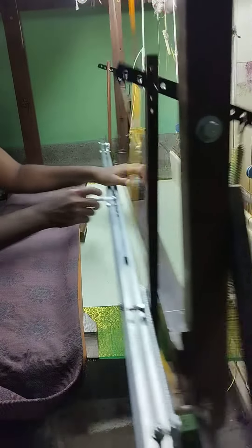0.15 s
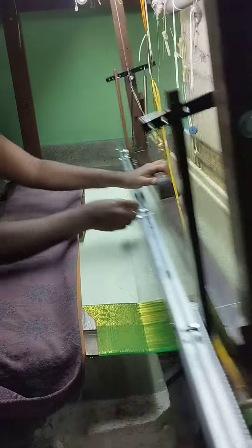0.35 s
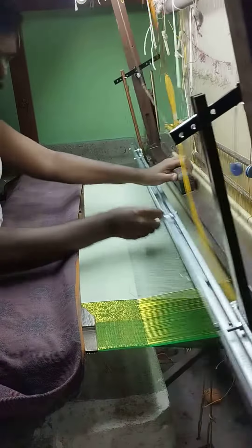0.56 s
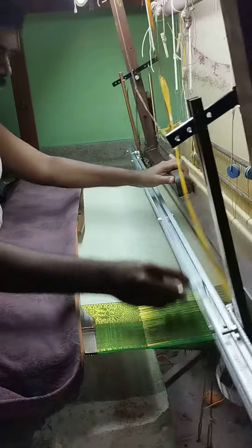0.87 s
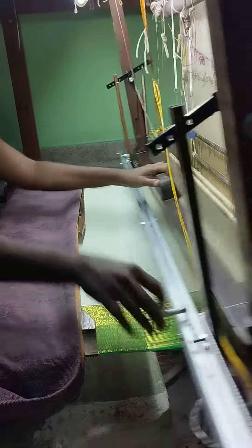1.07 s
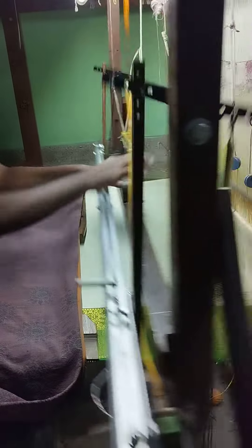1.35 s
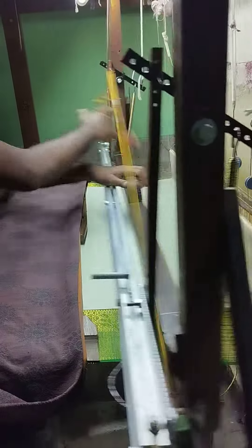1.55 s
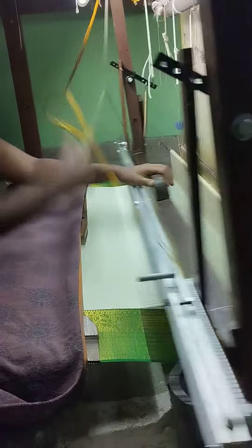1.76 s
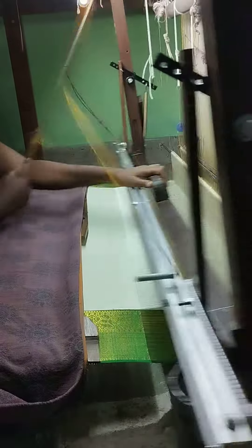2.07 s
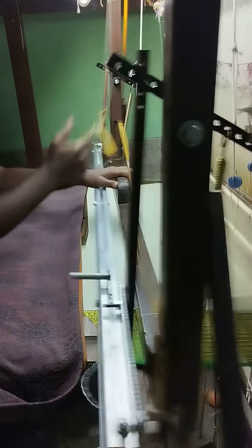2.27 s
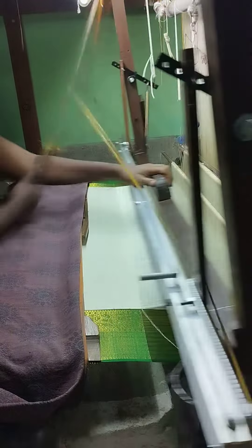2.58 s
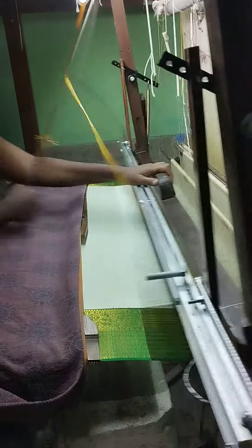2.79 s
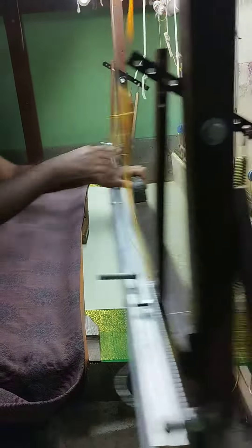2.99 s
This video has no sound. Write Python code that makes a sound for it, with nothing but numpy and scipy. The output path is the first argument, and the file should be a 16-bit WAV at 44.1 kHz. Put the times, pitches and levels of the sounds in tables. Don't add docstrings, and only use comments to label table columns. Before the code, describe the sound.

Handloom clatter: hard wood-and-metal clacks, ticking wires, a rail scrape and low frame thumps

```python
import sys
import numpy as np
from scipy import signal
from scipy.fft import rfft, irfft, next_fast_len
from scipy.io import wavfile

SR = 44100
rng = np.random.default_rng(int(sys.argv[2]) if len(sys.argv) > 2 else 0)


def to_wav(sig):
    pcm = np.clip(np.atleast_2d(sig), -1, 1) * 32767
    pcm = np.round(pcm).astype(np.int16)
    wavfile.write(sys.argv[1], SR, pcm.T)


def gain_from_db(level_db):
    decades = np.asarray(level_db, float) / 20
    return 10 ** decades


N = 138033

# pitch_hz, level_db [dB per Hz]
AIR_SPECTRUM = [(20, 1.5), (60, 3), (260, 5), (600, -4), (2500, -5.5), (6500, -15.5), (9000, -15),
                (15000, -26)]
# start_s, level_db [peak], brightness_db, centre_hz, chatter_t60_s
LEFT_CLACKS = [(-0.02, -10, -10, 1120, 0.4), (0.033, -17.5, -4, 2080, 0.28), (0.127, -25, -2, 6040, 0.25),
               (0.174, -12.5, -14, 1550, 0.083), (0.215, -26, -3, 2500, 0.3), (0.26, -27, -3, 4500, 0.3),
               (0.303, -27.5, 0, 3250, 0.35), (0.369, -14.5, -8, 2075, 0.17), (0.383, -22, 1, 3000, 0.15),
               (0.393, -15.5, -2.5, 4500, 0.097), (0.403, -18, -2.5, 3260, 0.21),
               (0.498, -19, -6, 860, 0.45), (0.618, -23, -5, 2650, 0.19), (1.0185, -2, -17, 2400, 0.12),
               (1.035, -11, -17, 2480, 0.25), (1.376, -19, 0.5, 3960, 0.1), (1.488, -10, -16, 2500, 0.068),
               (1.496, -10, -12, 3080, 0.06), (1.506, -12, -13, 2400, 0.081),
               (1.535, -9.5, -22, 1560, 0.064), (1.546, -13.5, -20, 1050, 0.17),
               (1.794, -22, -21, 1470, 0.074), (1.808, -22.5, -19, 1000, 0.15),
               (1.862, -19.5, -17, 1500, 0.26), (1.884, -7, -17, 980, 0.19), (1.904, -13.5, -6, 3080, 0.26),
               (2.848, -29, -31, 1050, 0.25), (2.872, -23, -15.5, 1990, 0.15),
               (2.8778, -4.5, -5.5, 2890, 0.11), (2.892, -9, -4, 2900, 0.11), (2.928, -16, -4.5, 2970, 0.2),
               (2.983, -16, -8, 3020, 0.23)]
# start_s, level_db [peak], brightness_db, centre_hz, chatter_t60_s
MIDDLE_CLACKS = [(2.1215, -11.5, -2.5, 2000, 0.053), (2.1265, -9.5, -3, 2630, 0.025),
                 (2.205, -24, -1, 2630, 0.2), (2.249, -14, -9, 1090, 0.25), (2.26, -12, 2, 4400, 0.031),
                 (2.337, -14, -7, 710, 0.1), (2.346, -5.5, -10, 2500, 0.16), (2.363, -8, -6, 1300, 0.16),
                 (2.376, -8, -9.5, 3080, 0.081), (2.398, -14.5, -20, 1600, 0.22),
                 (2.412, -12.5, -28, 1800, 0.27), (2.593, -28, -21, 2500, 0.1),
                 (2.601, -19.5, -7, 1000, 0.1), (2.616, -17, -12, 820, 0.15), (2.661, -20, -6, 2750, 0.044),
                 (2.6652, -8, -4, 2820, 0.023), (2.6795, -8, -7, 2620, 0.02),
                 (2.685, -15, -20, 2400, 0.064), (2.719, -13.5, -6, 2700, 0.029)]
# pitch_hz, level_db
CLACK_BODY = [(300, -45), (650, -5.5), (1000, -1), (2600, -2), (4000, -8)]
# pitch_hz, level_db
CLACK_EDGE = [(2500, -17.5), (4000, -4), (6300, -6.5), (8000, -11), (14000, -24)]
# start_s, level_db [peak], t60_s
HEDDLE_TICKS = [(-0.02, -18, 0.25), (0.1298, -15.5, 0.28), (0.22, -28, 0.3), (0.298, -24, 0.39),
                (0.3833, -10.5, 0.24), (0.4753, -15.5, 0.079), (0.494, -13.5, 0.12), (0.545, -24, 0.2),
                (0.6155, -19.5, 0.1), (0.6378, -21, 0.25), (0.6953, -23, 0.24), (0.837, -21.5, 0.18),
                (0.9415, -22.5, 0.11), (1.071, -27, 0.16), (1.1997, -28.5, 0.13), (1.285, -30, 0.15),
                (1.345, -27, 0.1), (1.3856, -23, 0.2), (1.4138, -13, 0.12), (1.886, -27, 0.19),
                (2.0448, -38, 0.15), (2.1216, -23, 0.075), (2.2617, -17, 0.056), (2.3424, -17, 0.099),
                (2.3615, -10.5, 0.054), (2.617, -29, 0.042), (2.6653, -27, 0.038), (2.8044, -30.5, 0.12),
                (2.878, -22, 0.21)]
# pitch_hz, level_db [dB per Hz]
WIRE_SPECTRUM = [(2500, -7), (4000, -7), (8300, -4.5), (12000, -6), (15000, -7)]
# start_s, level_db [peak]
FRAME_BLOWS = [(-0.02, -21), (0.39, -19), (0.53, -21.5), (1.415, -23), (1.458, -19), (1.505, -19),
               (1.881, -22), (2.26, -19.5), (2.337, -16.5), (2.615, -20.5), (2.664, -19)]
# pitch_hz, width_hz, level_db
FRAME_MODES = [(160, 29, -6.5), (218, 90, -1), (272, 25, 1), (370, 50, 0), (440, 103, -5)]
# start_s, level_db, pitch_hz, t60_s
FRAME_SWAYS = [(-0.01, -30, 262, 0.6), (0.22, -36, 55, 0.5), (0.53, -36, 270, 0.3), (1.02, -38, 57, 0.9),
               (2.39, -34, 158, 0.6), (2.335, -29, 365, 0.15), (0, -25.5, 80.4, 0.18),
               (0.101, -35, 70.4, 1), (0.39, -27, 27.6, 0.34), (0.418, -31.5, 160, 0.99),
               (0.499, -35.5, 97.5, .3), (1.459, -31, 65.9, 1), (1.528, -31, 99.4, 0.49),
               (1.752, -34.5, 58.5, 0.91), (1.887, -38, 99, 0.99), (2.119, -31, 30, 0.085),
               (1.458, -29, 265, 0.31), (2.339, -25, 74, 0.94), (2.664, -26, 269, 0.064),
               (2.561, -32.5, 79.5, 0.85)]
# start_s, level_db, pitch_hz, t60_s
RINGING_PARTS = [(0.176, -26, 1572, 0.18), (1.02, -14, 1700, 0.098), (1.019, -16, 1877, 0.081),
                 (1.019, -14.5, 2714, 0.04), (1.023, -17, 2500, 0.22), (1.029, -21, 1006, 0.11),
                 (0.305, -37, 6400, 0.18), (2.05, -43, 6300, 0.5), (2.135, -33, 6500, 0.3),
                 (0.18, -27.5, 1062, 0.19), (1.54, -26, 1047, 0.24), (1.794, -30, 1543, 0.11),
                 (1.806, -41, 2920, 0.18), (1.884, -16, 928, 0.15), (1.885, -17, 2900, 0.2),
                 (1.96, -30, 2930, 0.6), (2.352, -25, 2458, 0.35), (2.36, -26, 1825, 0.2),
                 (2.4, -28.5, 1556, 0.35), (2.4, -34, 1275, 0.4), (2.35, -24, 1066, 0.39),
                 (2.665, -36, 2860, 0.22), (2.878, -17.5, 2920, 0.16)]
# start_s, level_db
SLIDER_PRESSURE = [
    (.6, -37),
    (.68, -24),
    (.8, -20),
    (.92, -23),
    (1.02, -30.5),
]
# pitch_hz, width_hz, level_db
RAIL_MODES = [(903, 740, -2.5), (1300, 450, 5), (1780, 250, 2.5), (2500, 450, 0.5), (4900, 600, -9),
              (6540, 490, -6.5)]
# start_s, level_db
SHAFT_RUSH = [
    (1.18, -35.5),
    (1.36, -32),
    (1.42, -22),
    (1.5, -17.5),
    (1.57, -28.5),
    (1.68, -48),
]
# pitch_hz, level_db [dB per Hz]
SHAFT_SPECTRUM = [(100, -4.5), (260, -6.5), (600, -5), (2500, -4), (5500, -4.5), (14500, -12)]
# pitch_hz, t60_s
ROOM_DECAY = [(300, 0.74), (2000, 0.44), (6000, 0.45), (14000, 0.21)]
# pitch_hz, likeness [0 to 1]
LIKENESS = [(60, 0.85), (180, 0.98), (550, 0.52), (1500, 0.018)]
# pitch_hz, level_db, left_minus_right_db
PORTS = [(6460, 1.5, -5.5), (7730, -4.5, -4), (7900, -14.5, -8), (9560, -2.5, 4.5), (11030, -8.5, 10.5),
         (12430, 6, 2.5)]


def unit(x):
    return x / np.sqrt(np.mean(x ** 2) + 1e-20)


def along(points, hz):
    point_hz, value = np.transpose(points)
    return np.interp(np.log(hz + 1), np.log(point_hz + 1), value)


def filtered(x, response):
    n = x.shape[-1]
    size = next_fast_len(n + 8192)
    hz = np.fft.rfftfreq(size, 1 / SR)
    return irfft(rfft(x, size) * response(hz), size)[..., :n]


def coloured(x, points):
    return filtered(x, lambda hz: gain_from_db(along(points, hz)))


def resonances(f, rows):
    total = 0
    for k, (hz, width, db) in enumerate(rows):
        peak = 1j * f * width / (hz * hz - f * f + 1j * f * width)
        total = total + (-1) ** k * gain_from_db(db) * peak
    return total


def chatter(size, spiky_db, rate):
    contact = (np.arange(size) * rate / SR).astype(int)
    force = rng.exponential(1, size)[contact]
    return unit(rng.standard_normal(size) * gain_from_db(spiky_db * np.minimum(force, 4)))


def decay(t, attack_s, t60_s):
    return (1 - np.exp(-t / abs(attack_s))) * gain_from_db(-60 * t / max(t60_s, .01))


def soft_rise(db, loud_db):
    return gain_from_db(-0.5 * (db - loud_db))


def add(track, s, x):
    start = round(s * SR)
    part = track[..., max(start, 0):][..., :x.shape[-1] + min(start, 0)]
    part += x[..., max(-start, 0):][..., :part.shape[-1]]


def stroke(rows):
    s, db = np.transpose(rows)
    return gain_from_db(np.interp(np.arange(N) / SR, s, db, left=-120, right=-120))


def spread(pair):
    def mid_side(hz):
        angle = np.arccos(np.clip(along(LIKENESS, hz), -1, 1)) / 2
        return np.array([np.cos(angle), np.sin(angle)])
    mid, side = filtered(pair, mid_side)
    return np.array([mid + side, mid - side])


def placed(pair, lead):
    return np.array([pair[0], np.roll(pair[1], lead)])


def room_air():
    return gain_from_db(-36.5) * unit(spread(coloured(rng.standard_normal((2, N)), AIR_SPECTRUM)))


def clacks(rows):
    focus_db, focus_octaves = 6.5, .25
    crack_db, crack_t60_s = 4, .02
    out, t = np.zeros((2, N)), np.arange(SR // 4) / SR
    for s, db, edge_db, centre_hz, t60 in rows:
        def near(f):
            octaves = np.log2((f + 1) / centre_hz)
            return gain_from_db(focus_db * np.exp(-(octaves / focus_octaves) ** 2))
        raw = np.array([chatter(len(t), 1.6, 900) for _ in range(5)])
        shape = decay(t, 0.012 * t60 * soft_rise(db, -8), t60)
        shape = shape * (1 + gain_from_db(crack_db - 60 * t / crack_t60_s))
        dull = coloured(raw[0] + raw[1:3], [*CLACK_BODY, (5000, -92)])
        body = unit(filtered(dull, near))
        edge = unit(filtered(coloured(raw[3:], CLACK_EDGE), near))
        add(out, s, gain_from_db(db - 9.5) * shape * (body + gain_from_db(edge_db + 5) * edge))
    return out


def heddles():
    out, t = np.zeros((2, N)), np.arange(SR // 4) / SR
    fizz = np.array([chatter(N + SR, 3.5, 1500) for _ in range(2)])
    fizz = unit(coloured(fizz, WIRE_SPECTRUM))
    for s, db, t60 in HEDDLE_TICKS:
        grain = fizz[:, rng.integers(N):][:, :len(t)]
        shape = decay(t, 0.02 * t60 * soft_rise(db, -17), t60)
        add(out, s, gain_from_db(db - 2.5) * grain * shape)
    return out


def frame():
    sways, blows, t = np.zeros(N), np.zeros(N), np.arange(SR) / SR
    for s, db in FRAME_BLOWS:
        add(blows, s, gain_from_db(db + 10) * decay(t, 0.0012, 0.35) * rng.standard_normal(SR))
    for s, db, hz, t60 in FRAME_SWAYS:
        drift = np.cumsum(rng.standard_normal(SR)) * 0.018
        tone = np.sin(2 * np.pi * hz * t + drift)
        add(sways, s, gain_from_db(db + 2.5) * decay(t, 0.0095, t60) * tone)
    return sways + filtered(blows, lambda f: resonances(f, FRAME_MODES))


def rings():
    out, t = np.zeros((2, N)), np.arange(SR // 2) / SR
    for s, db, hz, t60 in RINGING_PARTS:
        wander = np.cumsum(rng.standard_normal(len(t))) * .025
        phase = wander + 6 * rng.random((2, 1))
        add(out, s, gain_from_db(db) * decay(t, 0.0004, t60) * np.sin(2 * np.pi * hz * t + phase))
    return out


def slider():
    def rail(f):
        return resonances(f, RAIL_MODES) / (1 + (f / 7000) ** 8)
    grains = chatter(N, 2.2, 900) + 2.03 * rng.standard_normal((2, N))
    return gain_from_db(-1.5) * stroke(SLIDER_PRESSURE) * unit(filtered(grains, rail))


def shafts():
    pair = np.array([chatter(N, 2.4, 700) for _ in range(2)])
    return gain_from_db(-0.5) * stroke(SHAFT_RUSH) * unit(coloured(pair, SHAFT_SPECTRUM))


def room(x):
    hz, t, z = signal.stft(rng.standard_normal((2, SR)), SR, nperseg=256)
    dying = z * gain_from_db(-60 * t / along(ROOM_DECAY, hz)[:, None])
    tail = signal.istft(dying, SR, nperseg=256)[1]
    tail = tail / np.linalg.norm(tail[0])
    late = np.pad(x, (220, 0))[None]
    return gain_from_db(-4.5) * spread(signal.fftconvolve(late, tail, axes=1)[:, :N])


def scene():
    left = placed(clacks(LEFT_CLACKS) + rings(), 20)
    middle = placed(clacks(MIDDLE_CLACKS), -6)
    near = left + middle + slider() + heddles() + spread(shafts())
    return near + frame() + room(near[0]) + room_air()


def band_limit(x):
    return signal.sosfilt(signal.butter(12, 16670, fs=SR, output="sos"), x)


def record(dry):
    hz, level_db, pan_db = np.transpose(PORTS)

    def ports(f):
        difference_db = np.interp(f, [3500, *hz], [0, *pan_db])
        return gain_from_db(np.interp(f, hz, level_db) + np.outer([.5, -.5], difference_db))
    heard = filtered(dry, ports)
    heard = heard / (1 + np.abs(heard) ** 4) ** (1 / 4)
    mix = filtered(heard, lambda f: f < 15800)
    return band_limit(mix)


dry = scene()
out = record(dry)
to_wav(out)
```